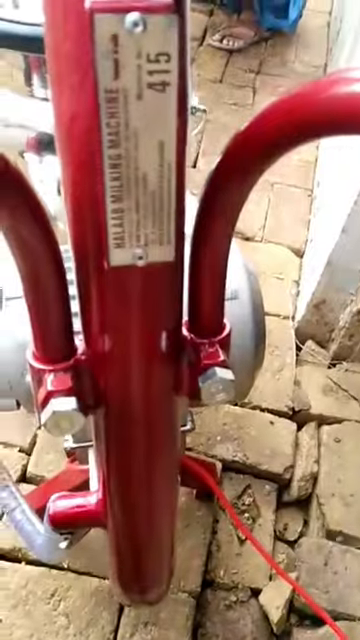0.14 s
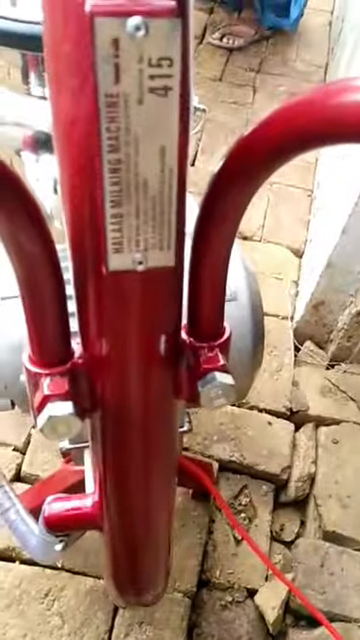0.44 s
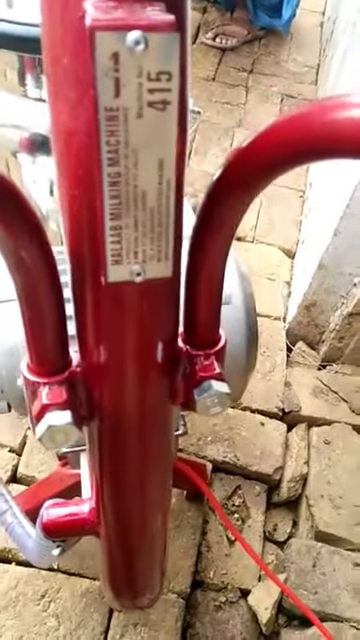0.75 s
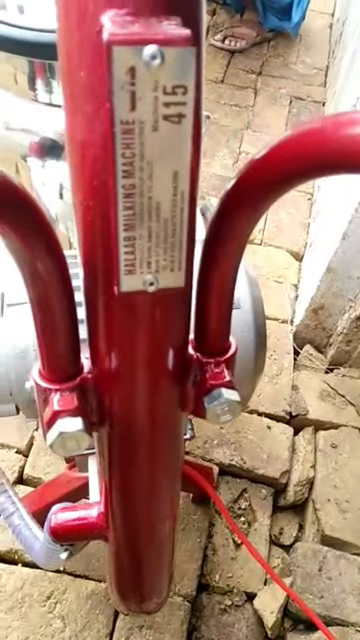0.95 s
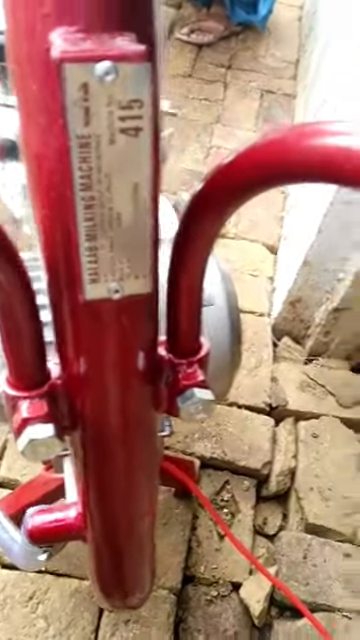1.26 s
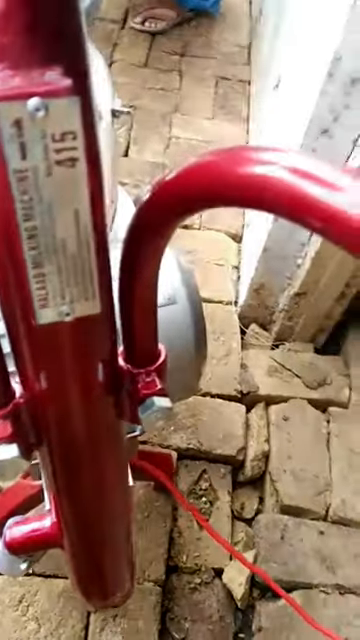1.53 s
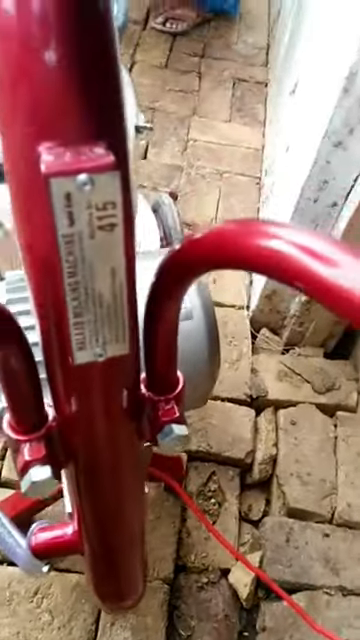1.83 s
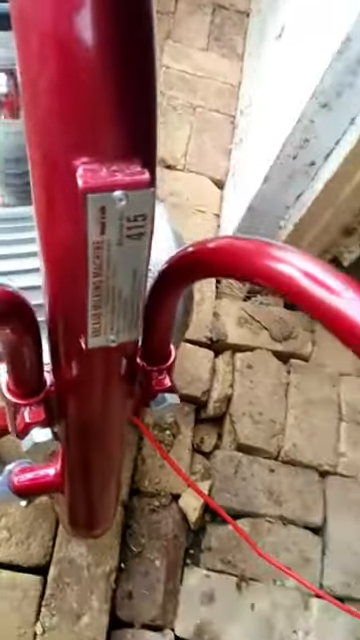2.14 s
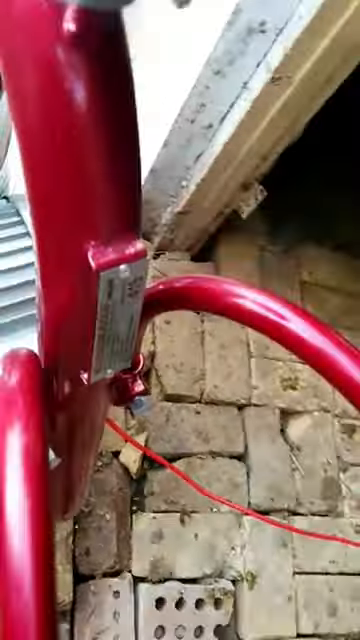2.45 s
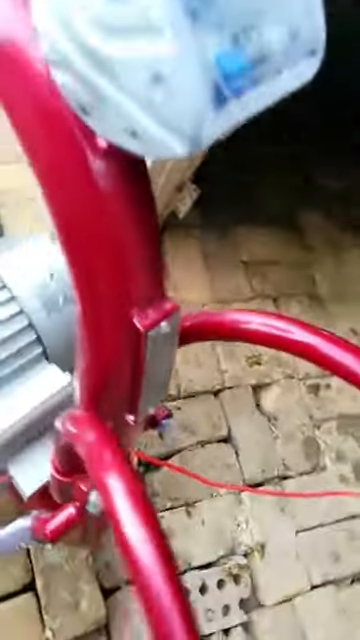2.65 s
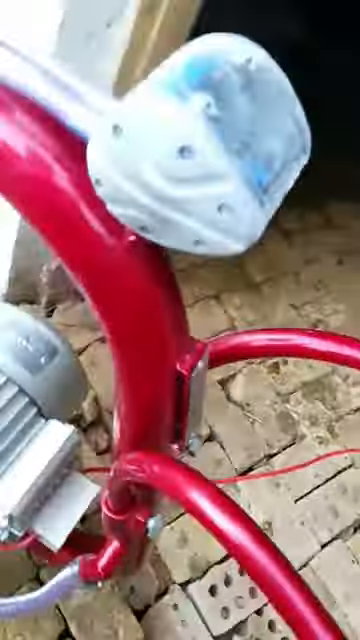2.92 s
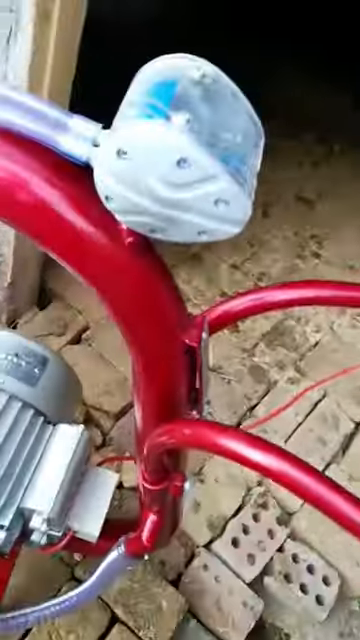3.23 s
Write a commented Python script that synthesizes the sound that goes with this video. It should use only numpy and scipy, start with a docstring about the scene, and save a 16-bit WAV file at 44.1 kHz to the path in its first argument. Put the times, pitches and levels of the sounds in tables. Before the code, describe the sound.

A milking machine's motor-driven vacuum pump runs steadily close by, a rasping, hissing drone over a low hum. Its pulsator clacks evenly a little over twice a second, and the tone shifts slightly as the microphone moves around it.

```python
"""Four-vane vacuum pump of a milking machine, motor-driven, on a brick floor, heard close by.
The vanes scrape much alike on every turn, slap the chamber wall, squeak and make the housing ring;
air hisses and the exhaust puffs unevenly over hum and whine. The pulsator clacks to and fro; each
stroke lets in air, so the puffs swell and sink at its rate. Levels and close echoes shift as the
listener moves round the frame."""
import sys
import numpy as np
from scipy import signal
from scipy.fft import rfft, irfft, next_fast_len
from scipy.io import wavfile
from scipy.ndimage import uniform_filter1d, minimum_filter1d, map_coordinates

SR = 44100
rng = np.random.default_rng(int(sys.argv[2]) if len(sys.argv) > 2 else 0)


def inscribe(sig):
    """Save sig as 16-bit PCM at rate SR to the path in sys.argv[1].

    A 1-D sig is mono; a 2-D sig holds one channel per row.
    Samples are clipped to [-1, 1] before scaling.
    """
    pcm = np.round(np.clip(np.atleast_2d(sig).T, -1, 1) * 32767)
    wavfile.write(sys.argv[1], SR, pcm.astype(np.int16))


N = 149058

SHAFT_HZ, MAINS_HZ, VANES = 24.455, 50, 4
PULSATOR_PERIOD_S = .4297

# motor hum: mains harmonic, level/dB
MOTOR_LINES = [(2, -62), (6, -42)]
# pump hum: shaft harmonic, level/dB
PUMP_LINES = [(4, -53.5), (8, -41), (16, -41), (20, -50)]
# pump whine: shaft harmonic, relative level/dB
WHINE_LINES = [(32, -5), (36, -5), (48, -3), (56, 2), (60, -5.5), (64, -1.5), (76, -0.5)]
# whine along the listener's path: t/s, gain/dB
WHINE_PATH = [(.1, -50), (2.1, -49.5), (2.7, -44), (3.38, -42)]
# gains along the path: t/s, scrape and air/dB, slap/dB, pump hum/dB
PATH_GAINS = [(.1, 0.5, -4, 1.5), (.9, -0.4, -0.5, 1.5), (1.5, 0, -1, 1.5), (2.1, -0.7, 0, 2),
              (2.5, -1, -4.5, 1.5), (2.9, 0.1, 6.5, 2.5), (3.38, 0.5, 3.5, 2)]
# exhaust puff of each vane: relative level/dB
VANE_PUFF_DB = [-3, -14.5, -5.5, -1.5]
# exhaust puff spectrum: f/Hz, relative level/dB
PUFF_SPECTRUM = [(40, -37.5), (100, -27), (220, -18.5), (290, -3), (410, -1), (500, 0.5), (680, -5.5),
                 (880, -4.5), (1150, -16), (1600, -24), (3000, -37), (8000, -87)]
# vane slap spectrum: f/Hz, relative level/dB
SLAP_SPECTRUM = [(300, -36), (800, -7), (1050, -14.5), (1370, 2), (1570, -2), (1860, 0.5), (2150, -1),
                 (2740, -5.5), (3300, -14), (6000, -20), (10000, -33), (16000, -52)]
# squeaks within a turn: position/turns, relative level/dB
SQUEAK_POINTS = [(.14, -3), (.62, -9)]
# squeak envelope: t/s, gain/dB
SQUEAK_GAIN = [(.1, -16.5), (.7, -15.5), (.9, -22), (1.12, -13.5), (1.45, -20), (1.95, -22), (2.15, -16.5),
               (2.35, -20), (3.38, -46)]
# housing resonances: f/Hz, width/Hz
HOUSING_MODES = [(1570, 96), (2380, 87), (4020, 33), (4380, 165), (5610, 160), (6970, 75), (9550, 170)]
# housing along the path: t/s, then level/dB of each resonance
HOUSING_PATH = [(.1, -35, -55, -50, -43, -28, -43, -42), (1.1, -33.5, -54, -56, -38, -26.5, -32, -34),
                (1.7, -33.5, -45, -56, -34, -32, -45, -41), (2.3, -37, -51, -31, -26.5, -37, -42, -43),
                (2.55, -47, -53, -39, -30, -36, -39, -43), (2.8, -39, -48, -40, -34, -40, -50, -38),
                (3.0, -39, -33.5, -34, -30, -34.5, -42, -36), (3.38, -36, -31, -30, -35, -53, -28.5, -31.5)]
# pulsator strokes: t/s, gain/dB, ring f/Hz, clatter gain/dB, case mode tilt/(dB/octave)
PULSATOR_STROKES = [(.1007, 3, 2090, 1, 7), (0.5356, -4, 2090, -4, -8), (0.9584, -2, 2060, 1, 3),
                    (1.3947, -2.5, 2050, -1.5, -2), (1.8187, 1.5, 2070, 1, 7), (2.2535, -5, 2110, 0.5, -10),
                    (2.6777, 1, 2040, 2.5, 2), (3.1148, -1, 2110, -3, -3)]
# slide contacts within a stroke: delay/s, gain/dB
SLIDE_CONTACTS = [(0, -8), (.0013, 1), (.0052, 0)]
# pulsator case modes: f/Hz, relative level/dB, t60/s
PULSATOR_MODES = [(2734, -4, 0.048), (3180, -6, 0.017), (3610, -3, 0.037), (3940, 0, 0.026),
                  (4893, -2, 0.031), (5250, -4, 0.019), (6660, -10, 0.022)]
# echoes off frame, bricks and door post: first delay/s, last delay/s, relative level/dB
NEAR_ECHOES = [(.0016, .0021, -15.5), (.0037, .0033, -10), (.0059, .0066, -12.5)]
# air rush spectrum: f/Hz, relative level/dB
AIR_SPECTRUM = [(25, -20), (60, -11.5), (160, -7.5), (240, -11.5), (320, -3), (1000, -7), (1600, -6.5),
                (2700, -2), (3150, -5), (3350, -5), (3550, -6.5), (3750, -4), (4400, -1), (6000, 0),
                (8000, -1.5), (10500, -8), (14000, -10), (16000, -23)]
# vane scrape spectrum: f/Hz, relative level/dB
SCRAPE_SPECTRUM = [(150, -29.5), (500, -8), (1100, -14.5), (1400, -11.5), (1580, -2.5), (1800, -6.5),
                   (2300, -1.5), (2750, -1), (3150, -4), (3420, -10), (3750, -6), (4400, 0.5), (5200, -2),
                   (6400, -3), (7000, -1), (8500, -7.5), (12000, -12.5), (16000, -29)]


def undb(db):
    """Decibels to gain."""
    return 10 ** (np.asarray(db) / 20)


def at_rms(x, db):
    """Scale to an rms level."""
    return x * undb(db) / np.sqrt(np.mean(x ** 2))


def curves(rows, t):
    """Table columns, linearly interpolated in time."""
    times, *columns = np.array(rows).T
    return [np.interp(t, times, column) for column in columns]


def wander(rate_hz):
    """Smooth random drift, spread near 1."""
    hold = int(SR / rate_hz)
    steps = np.repeat(rng.standard_normal(N // hold + 1), hold)
    return 1.2 * uniform_filter1d(uniform_filter1d(steps, hold), hold)[:N]


def colour(x, spectrum):
    """Minimum-phase filter through (f/Hz, level/dB) points."""
    size = next_fast_len(N) * 2
    hz, db = np.array(spectrum).T
    bins_hz = np.maximum(np.arange(size // 2 + 1) * SR / size, 1)
    gain = undb(np.interp(np.log(bins_hz), np.log(hz), db))
    cepstrum = irfft(np.log(gain))
    cepstrum[1:size // 2] *= 2
    cepstrum[size // 2 + 1:] = 0
    return irfft(rfft(x, size) * np.exp(rfft(cepstrum)))[:N]


def resonate(x, hz, width_hz):
    """Two-pole resonance."""
    return signal.lfilter(*signal.iirpeak(hz, hz / width_hz, fs=SR), x)


def highpass(x, hz):
    """Third-order low cut."""
    return signal.sosfilt(signal.butter(3, hz, "high", fs=SR, output="sos"), x)


def cycle(phase):
    """Cosine, phase in cycles."""
    return np.cos(2 * np.pi * phase)


def vane_times(t, turns):
    """Time/s of each vane pass."""
    return np.interp(np.arange(int(turns[-1] * VANES)) / VANES, turns, t)


def pulses(times_s, db):
    """Train of negative impulses."""
    out = np.zeros(N)
    out[(times_s * SR).astype(int)] = -undb(db)
    return out


def friction(turns, worn_share, memory_turns=3.07):
    """Roughness per turn: a lasting worn pattern plus a part that renews within a few turns."""
    size = int(SR / SHAFT_HZ)
    keep = np.exp(-1 / memory_turns)
    worn = rng.standard_normal(size)
    fresh = rng.standard_normal((N // size + 4, size))
    drifting, _ = signal.lfilter([np.sqrt(1 - keep ** 2)], [1, -keep], fresh, axis=0, zi=keep * fresh[-1:])
    track = np.sqrt(worn_share) * worn + np.sqrt(1 - worn_share) * drifting
    return map_coordinates(track.ravel(), [(turns + 1) * size], order=5, mode="mirror")


def near_echoes(x, t, moves_at_s=1.5):
    """Close surfaces comb the sound; the delays glide as the listener moves."""
    moved = np.clip((t - moves_at_s) / (t[-1] - moves_at_s), 0, 1)
    out, power = x.copy(), 1
    for first_s, last_s, db in NEAR_ECHOES:
        delay_s = first_s + (last_s - first_s) * moved
        out += undb(db) * map_coordinates(x, [(t - delay_s) * SR], order=3, mode="mirror")
        power += undb(db) ** 2
    return out / np.sqrt(power)


def hum(t, turns, waver_db=4.5, waver_cycles=.37):
    """Low pump harmonics; wavering mains hum beats against them."""
    pump = sum(undb(db) * cycle(k * turns) for k, db in PUMP_LINES)
    motor = sum(undb(db + waver_db * wander(6.2)) * cycle(k * MAINS_HZ * t + waver_cycles * wander(6.3))
                for k, db in MOTOR_LINES)
    _, _, path_db = curves(PATH_GAINS, t)
    return np.sqrt(2) * (motor - pump * undb(path_db))


def whine(t, turns, drift_cycles=.034):
    """Clean upper vane harmonics, a whine that grows louder toward the end."""
    lines = sum(undb(db) * cycle(k * turns + rng.random() + drift_cycles * wander(4.13))
                for k, db in WHINE_LINES)
    return np.sqrt(2) * lines * undb(curves(WHINE_PATH, t)[0])


def slaps(t, turns, scatter_db=.5):
    """Each vane slaps the chamber wall: a midrange buzz."""
    times_s = vane_times(t, turns)
    hits = pulses(times_s, scatter_db * rng.standard_normal(len(times_s)))
    _, path_db, _ = curves(PATH_GAINS, t)
    return at_rms(colour(hits, SLAP_SPECTRUM), -35.5) * undb(path_db)


def exhaust(t, turns, swell_db=3, swell_peak_s=.15, scatter_db=.8):
    """One puff per vane, stronger after the pulsator lets in air."""
    times_s = vane_times(t, turns)
    db = np.resize(VANE_PUFF_DB, len(times_s))
    db = db + swell_db * cycle((times_s - swell_peak_s) / PULSATOR_PERIOD_S)
    db += scatter_db * rng.standard_normal(len(times_s))
    return at_rms(colour(pulses(times_s, db), PUFF_SPECTRUM), -32.5)


def squeaks(t, turns, rise_s=.0059, jitter_s=.0039, scatter_db=3, slip_cycles=.18):
    """A vane catches twice a turn: thin, uneven tone bursts near 5.6 kHz."""
    out, age_s = np.zeros(N + SR), t[:SR // 20]
    squeak_hz = 230 * SHAFT_HZ
    burst = (age_s / rise_s * np.exp(1 - age_s / rise_s)) ** 2
    for turn in range(1, int(turns[-1]) + 1):
        for position, db in SQUEAK_POINTS:
            late, strength, slip = rng.standard_normal(3)
            peak_s = np.interp(turn + position, turns, t) + jitter_s * late
            i = int((peak_s - rise_s) * SR)
            tone = cycle(squeak_hz * (i / SR + age_s) + slip_cycles * slip)
            out[i:i + len(age_s)] += undb(db + scatter_db * strength) * burst * tone
    return out[:N] * undb(curves(SQUEAK_GAIN, t)[0])


def housing(t, turns, flutter_db=1.7):
    """Vane friction keeps the housing resonances ringing."""
    rub = friction(turns, worn_share=.3) * undb(flutter_db * wander(25.15))
    rings = [resonate(resonate(rub, hz, width_hz), hz, 4 * width_hz) for hz, width_hz in HOUSING_MODES]
    return sum(at_rms(ring, db) for ring, db in zip(rings, curves(HOUSING_PATH, t)))


def pulsator(t, ring_t60_s=.049, crack_t60_s=.034, tilt_centre_hz=3800, detune=.0095):
    """The slide hits its stop and chatters: a ring near 2 kHz, case modes, a short crack."""
    out, age_s = np.zeros(N), t[:SR // 10]
    decay = lambda t60_s: undb(-60 * age_s / t60_s)
    mode = lambda hz, t60_s: np.sin(2 * np.pi * hz * age_s) * decay(t60_s)
    attack = 1 - decay(.0093)
    for start_s, stroke_db, ring_hz, clatter_db, tilt_db_per_oct in PULSATOR_STROKES:
        i = int(start_s * SR)
        out[i:i + len(age_s)] += 2.667 * undb(stroke_db) * attack * mode(ring_hz, ring_t60_s)
        for delay_s, contact_db in SLIDE_CONTACTS:
            case = np.zeros(len(age_s))
            for hz, db, t60_s in PULSATOR_MODES:
                gain = undb(db + tilt_db_per_oct * np.log2(hz / tilt_centre_hz))
                case += gain * mode(hz * (1 + detune * rng.standard_normal()), t60_s)
            noise = resonate(rng.standard_normal(len(age_s)), hz=3900, width_hz=3000)
            crack = at_rms(noise, -2) * decay(crack_t60_s)
            i = int((start_s + delay_s) * SR)
            out[i:i + len(age_s)] += undb(stroke_db + clatter_db + contact_db) * (case + crack)
    return undb(-16) * highpass(out, hz=1500)


def air_rush(turns, pulse_db=3.3, flutter_db=1.14):
    """Rushing air: a fluttering hiss that peaks at each vane pass."""
    envelope = undb(pulse_db * cycle(VANES * turns) + flutter_db * wander(39.53))
    return at_rms(colour(rng.standard_normal(N) * envelope, AIR_SPECTRUM), -24.5)


def vane_scrape(turns, dip_db=1):
    """Vanes scrape over much the same roughness each turn; the level dips at each pass."""
    rub = friction(turns, worn_share=.73) * undb(-dip_db * cycle(VANES * turns))
    return at_rms(colour(rub, SCRAPE_SPECTRUM), -24)


def pump_rasp(t, turns, swing_db=1, peak_turns=.017):
    """Scrape and air together, swelling once a turn."""
    path_db, _, _ = curves(PATH_GAINS, t)
    gain = undb(path_db + swing_db * cycle(turns - peak_turns))
    return gain * (vane_scrape(turns) + air_rush(turns))


def scene():
    """One slightly unsteady shaft drives the pump; the pulsator keeps its own time."""
    t = np.arange(N) / SR
    first_puff_s, drift_turns = .0042, .00047
    turns = SHAFT_HZ * (t - first_puff_s) + drift_turns * wander(4.33)
    drone = exhaust(t, turns) + hum(t, turns) + slaps(t, turns) + whine(t, turns)
    rasp = near_echoes(pump_rasp(t, turns), t) + housing(t, turns) + squeaks(t, turns)
    return (drone + rasp + pulsator(t))[None]


def record(dry):
    """Low cut, short fade-in, limiter on the loudest clacks, top cut."""
    opens_s, fade_s = .084, .019
    limit_db, window_s, top_hz = -14, .0082, 15750
    fade_in = np.clip((np.arange(N) / SR - opens_s) / fade_s, 0, 1)
    x = highpass(dry, hz=45) * fade_in
    window = int(window_s * SR)
    rms = np.sqrt(np.maximum(uniform_filter1d(x ** 2, window), 1e-12))
    gain = np.minimum(undb(limit_db) / rms, 1)
    gain = uniform_filter1d(minimum_filter1d(gain, window), window)
    lowpass = signal.ellip(10, .2, 90, top_hz, fs=SR, output="sos")
    return signal.sosfilt(lowpass, x * gain)


dry = scene()
out = record(dry)
inscribe(out)
```